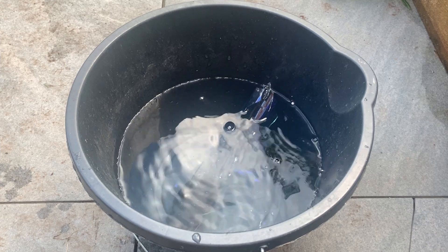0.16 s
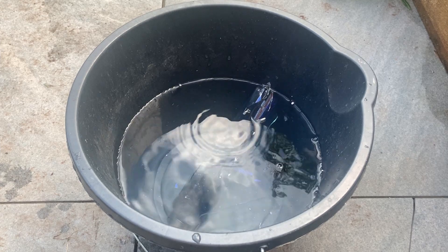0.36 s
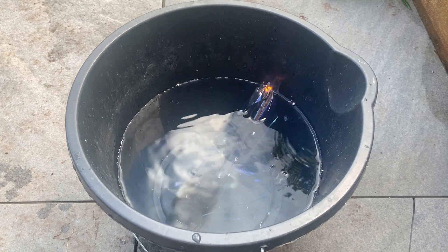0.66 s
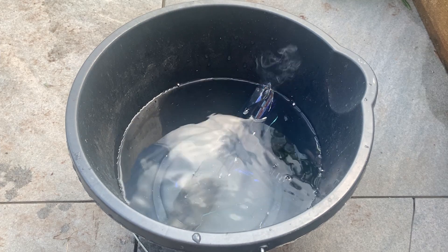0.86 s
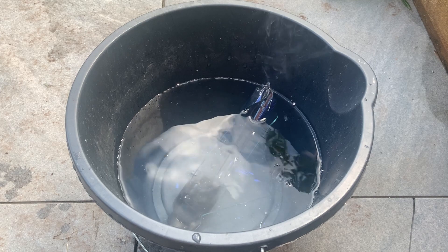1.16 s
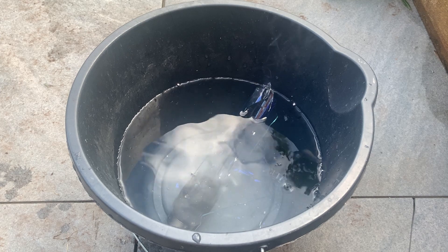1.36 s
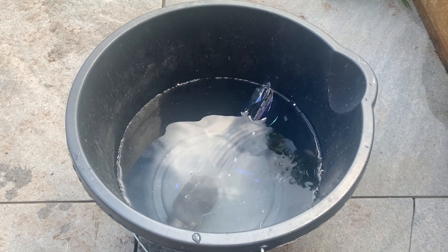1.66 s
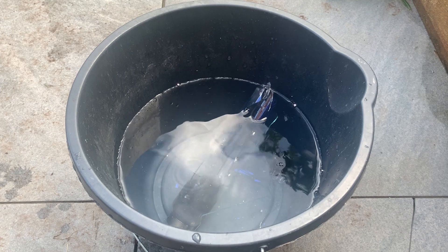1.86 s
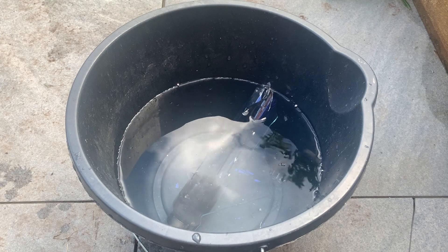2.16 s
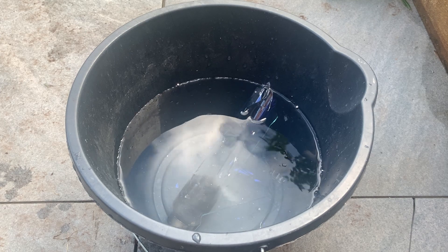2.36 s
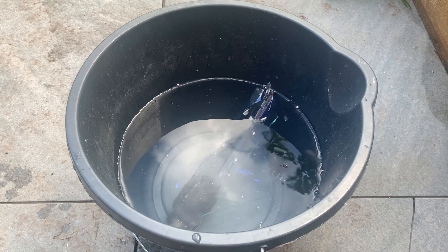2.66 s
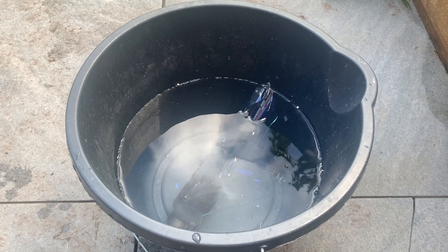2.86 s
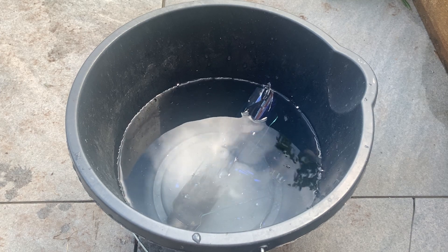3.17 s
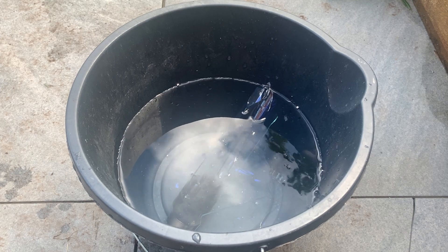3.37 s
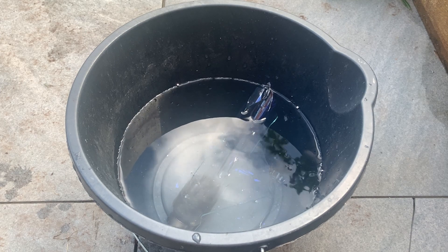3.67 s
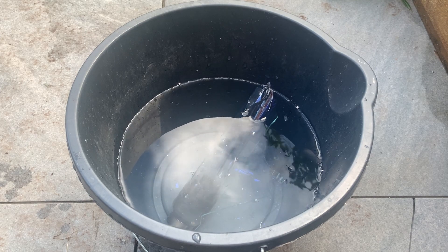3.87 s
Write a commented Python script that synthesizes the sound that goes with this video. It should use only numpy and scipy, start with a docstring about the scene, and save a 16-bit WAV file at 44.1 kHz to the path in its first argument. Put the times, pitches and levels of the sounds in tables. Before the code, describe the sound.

Steady sizzling hiss and fine crackle from a bucket of water outdoors, low throbs underneath, squeaky downward whistles midway, ending in a sharp pop.

```python
"""A lump of sodium skates on the water in a plastic bucket on a patio, heard from just above the rim.
From the start gas hisses, bubbles and spatter crackle and the water rumbles, over a faint outdoor wash; all
are shaped noise or click rains. Sharp ticks dot the fizz, and low wavering tones throb in spells from 0.5 s.
Gliding sines whistle downwards from 1.8 to 3 s, then the fizz shifts colour as the lump reaches the wall.
At the very end the gas catches fire: noise cracks, then a pop of swelling and dying sines."""
import sys
import numpy as np
from scipy import signal
from scipy.fft import rfft, irfft, next_fast_len
from scipy.io import wavfile

SR = 44100
rng = np.random.default_rng(int(sys.argv[2]) if len(sys.argv) > 2 else 0)


def master_out(mix):
    """Clip the mix to full scale and print it as 16-bit PCM to the path in sys.argv[1]."""
    frames = np.transpose(np.atleast_2d(mix))
    ceiling = np.clip(frames, -1, 1)
    pcm = np.round(ceiling * 32767).astype(np.int16)
    wavfile.write(sys.argv[1], SR, pcm)


N = 177237
T = np.arange(N) / SR  # s
FREQS = np.arange(next_fast_len(N) // 2 + 1) * SR / next_fast_len(N)  # Hz

# where the lump floats: [t/s, place: 0 off the wall .. 1 against it]
LUMP_DRIFT = [(3.05, 0), (3.2, 1)]
# how hard the water boils round the metal: [t/s, level/dB]
BOIL_LEVEL = [(0.0, -51), (0.12, -53.5), (0.17, -50), (0.23, -46.5), (0.48, -47.5), (0.58, -44.5),
              (0.64, -45.5), (1.02, -44), (1.17, -46), (2.64, -47), (2.67, -50), (2.87, -48.5),
              (2.89, -50.5), (3.15, -49.5), (3.21, -46), (3.28, -47.5), (3.47, -46.5), (3.84, -51),
              (3.94, -47)]
STEADY_BOIL_DB = -46
# the escaping gas, before JET_GAIN_DB: [t/s, level/dB]
GAS_LEVEL = [(0.0, -38), (0.19, -39.5), (0.21, -42), (0.46, -40.5), (2.07, -41.5), (2.09, -44.5),
             (2.2, -42), (3.16, -42), (3.49, -38), (3.6, -40.5), (3.91, -37.5), (4.02, -44.5)]
JET_GAIN_DB = 3.5
# sudden spurts of gas: [t/s, rise/dB]
GAS_SPURTS = [(1.105, 2), (2.345, 3), (2.532, 4.5), (2.865, 2), (3.111, 3.5), (3.79, 2.5)]
SPURT_S, SPURT_JET_SHARE = 0.0064, 0.88  # bell width; part of the rise in dB that the jet takes

# relative spectra of the fizz in open water and against the wall: [f/Hz, level/dB]
JET_COLOUR = [(2000, -40), (5000, -24), (7000, -15), (7800, -12), (8100, -3.5), (8450, -1.3), (8700, -2.5),
              (9200, 1), (10000, .3), (10500, -1), (11100, -.3), (12300, -2.3), (12900, -1), (14300, -4),
              (15800, -4.5)]
JET_WALL_COLOUR = [(2000, -40), (5000, -22), (7000, -15), (7850, -12), (8100, 0), (8550, .7), (9100, -.7),
                   (9800, -3.5), (11700, 1), (12300, 0), (12950, 2.5), (14350, -8.5), (15200, -2),
                   (15800, -2)]
BUBBLE_COLOUR = [(1000, -30), (1950, -14), (2650, -4.5), (2950, -3), (3300, -1), (3750, .7), (4100, -1.5),
                 (4650, -8), (5300, -6.5), (6000, 0), (6600, -6.5), (7200, -3.5), (7700, -6), (10000, -10),
                 (16000, -20)]
BUBBLE_WALL_COLOUR = [(1000, -32), (2300, -14), (3000, -6), (4400, -3), (5300, 0), (6000, 0), (6450, -6),
                      (7700, -7), (16000, -18)]
# relative spectra of spatter, churning water, rumble, igniting gas and still outdoor air: [f/Hz, level/dB]
SPATTER_COLOUR = [(120, -10), (220, 1.5), (310, -3), (400, -.5), (510, -1), (580, -1), (660, -.5),
                  (750, -.5), (880, 2), (1100, .5), (1400, -2), (2000, -1.5), (3000, -5), (6000, -22)]
CHURN_COLOUR = [(200, -20), (330, -6), (400, 0), (520, 1), (580, -8), (750, -5), (1200, -25)]
RUMBLE_COLOUR = [(20, -50), (40, -18), (60, -5.5), (80, 5), (100, -3), (125, -1.5), (170, -15), (230, -13),
                 (320, -46), (600, -32)]
CRACK_COLOUR = [(300, -14), (1200, 6), (2000, 6), (2600, 8), (4000, 7), (5600, 7), (8000, -3), (14000, -14)]
AIR_COLOUR = [(30, -6), (100, 0), (300, -3), (500, -1), (900, 0), (1500, -4), (3000, -9), (4400, -30),
              (16000, -38)]

# levels at a steady boil, and the dB that each gains for one dB more boiling
BUBBLE_DB, BUBBLE_GROWTH = -42.5, 1.82
SPATTER_DB, SPATTER_GROWTH = -53.5, 1
CHURN_DB, CHURN_GROWTH = -65, 4.5
RUMBLE_DB, RUMBLE_GROWTH = -53, 0.9
SPATTER_AT_WALL_DB = -2
# air resonances of the bucket: [f/Hz, width/Hz, lift/dB]
BUCKET_RESONANCES = [(490, 90, 1.5), (875, 90, 3), (1290, 80, 3), (2150, 140, 3), (2595, 90, 5),
                     (2956, 100, 4.5), (4006, 65, 6), (4430, 160, 2.5), (4830, 110, 2), (5400, 130, 2.5),
                     (5760, 130, 2.5), (6150, 80, 4.5), (6490, 90, 2.5)]

# the cushion's faint lasting oscillations, before waver and flutter: [f/Hz, level/dB]
LASTING_THROBS = [(54.3, -63), (96.4, -66)]
# spells of throbbing, before waver and flutter: [t/s, length/s, f/Hz, rise/(Hz/s), level/dB]
THROB_SPELLS = [(0.491, 0.64, 153.8, 29.5, -61), (1.24, 0.51, 96.54, -2, -53), (1.3, 1.3, 54.2, -1, -57.5),
                (1.6, 0.36, 124.2, 3.5, -60.5), (1.958, 0.67, 96.15, 0, -51),
                (2.65, 0.31, 54.24, -1, -52.5), (3.178, 0.26, 54.3, 2.5, -49), (3.5, 0.51, 54.3, 0.5, -58)]
THROB_ATTACK_S, THROB_RELEASE_S = 0.074, 0.04
THROB_WAVER, THROB_OCTAVE_DB = 0.0337, -16  # rms share of the pitch; octave against fundamental

# larger bubbles that snap, noise level at the onset: [t/s, level/dB]
BUBBLE_SNAPS = [(0.087, -35), (0.184, -36), (2.537, -36), (3.360, -28)]
SNAP_S = .00025  # decay
# steam whistles, before waver, trim and flutter: [t/s, length/s, first f/Hz, last f/Hz, level/dB]
STEAM_WHISTLES = [(1.765, 0.035, 7160, 6750, -45), (1.985, 0.09, 7080, 6200, -42),
                  (2.06, 0.085, 6400, 5270, -43), (2.215, 0.045, 5450, 4930, -42),
                  (2.51, 0.125, 7170, 5900, -43.5), (2.733, 0.1, 7070, 6300, -42),
                  (2.825, 0.066, 6380, 5660, -40.5), (2.96, 0.058, 5950, 5100, -47.5)]
WHISTLE_TRIM_DB, WHISTLE_FLUTTER_DB, WHISTLE_WAVER = -5.5, 2, 0.009  # waver: rms share of the pitch

# cracks of the igniting gas, noise level at the onset: [t/s, level/dB]
GAS_CRACKS = [(3.9655, -38), (3.967, -32), (3.969, -25)]
# air and wall of the bucket, rung by the pop, before POP_GAIN_DB: [f/Hz, peak level/dB, time to swell/s]
POP_RESONANCES = [(92, -36.5, .014), (140, -43, .012), (255, -45, .009), (360, -37.5, .0075),
                  (600, -33.5, .0057), (690, -43, .006), (965, -38.5, .004), (1280, -49, .003),
                  (1850, -53, .0022)]
POP_GAIN_DB, POP_S = 3.5, 3.9675  # POP_S: start

# stereo image by frequency: [f/Hz, left phase lead/rad, left minus right/dB, share of diffuse power]
STEREO_IMAGE = [(60, 0, 0, .015), (200, -.25, 0, .04), (330, -.9, 0, .08), (520, -1.05, -1.5, .14),
                (680, -1.3, -2.5, .2), (850, -2.3, -4, .7), (1080, .1, -3, .8), (1300, 0, -3, .33),
                (1650, .3, -2.5, .2), (2400, 1.8, -3, .33), (3400, 1.4, -.5, .23), (4100, 2.2, 0, .13),
                (4350, 3.08, 0, .001), (5050, 3.2, 0, .001), (5500, 4.3, 0, .2), (6700, 6.28, 0, .06),
                (7800, 7.3, 0, .2), (8750, 9.25, 0, .004), (9050, 9.58, 0, .004), (10000, 11.1, 0, .13),
                (12200, 14.2, 0, .13), (13100, 15.55, 0, .004), (13450, 15.87, 0, .004),
                (14300, 17.3, 0, .16), (16000, 19.4, 0, .05)]
RIPPLE_HZ, ECHO_S = 55, .004  # rate at which echoes change; longest echo delay
TOP_HZ = 15720


def undb(db):
    """Decibels to gain."""
    return 10 ** (np.asarray(db) / 20)


def unit(x):
    """Scale to rms 1."""
    return x / np.sqrt(np.mean(x ** 2))


def curve(table):
    """Join the points of a two-column time table, one value a sample."""
    s, values = np.transpose(table)
    return np.interp(T, s, values)


def filtered(x, response):
    """Filter by a complex gain at each of FREQS."""
    size = next_fast_len(N)
    return irfft(rfft(x, size) * response, size)[:N]


def colour(x, points):
    """Shape to a relative spectrum, joined over log frequency; rms 1."""
    hz, db = np.transpose(points)
    level_db = np.interp(np.log(FREQS + 1), np.log(hz), db)
    return unit(filtered(x, undb(level_db)))


def noise(points):
    """Steady coloured hiss; rms 1."""
    return colour(rng.standard_normal(N), points)


def walk(rate):
    """Smooth random drift with most of its motion below rate in Hz; rms 1."""
    return unit(filtered(rng.standard_normal(N), 1 / (1 + (FREQS / rate) ** 4)))


def bursts(per_s, spread_db):
    """A dense rain of clicks of random sign, most small and a few large; rms 1."""
    happens = rng.random(N) < per_s / SR
    size = undb(spread_db * np.minimum(rng.exponential(size=N), 5))
    return unit(happens * size * rng.choice([-1, 1], N))


def tone(hz):
    """A sine of rms 1 that follows a pitch curve."""
    return np.sqrt(2) * np.sin(2 * np.pi * np.cumsum(hz) / SR)


def vigour():
    """Decibels by which the boiling exceeds its steady level."""
    return curve(BOIL_LEVEL) - STEADY_BOIL_DB


def drifting(x, open_water, at_wall):
    """The colour of a source changes as the lump drifts up to the wall."""
    near_wall = curve(LUMP_DRIFT)
    return (1 - near_wall) * colour(x, open_water) + near_wall * colour(x, at_wall)


def jet(spurt, surge_db):
    """Escaping gas hisses: a bright click rain that follows the gas flow and its spurts."""
    rain = drifting(bursts(per_s=22000, spread_db=2.0), JET_COLOUR, JET_WALL_COLOUR)
    level_db = curve(GAS_LEVEL) + JET_GAIN_DB + SPURT_JET_SHARE * surge_db
    return rain * undb(level_db + 0.4 * spurt + 1.28 * walk(rate=190))


def bubbles(spurt):
    """Tiny bubbles burst, and grow louder with the boiling."""
    rain = drifting(bursts(per_s=14000, spread_db=0.5), BUBBLE_COLOUR, BUBBLE_WALL_COLOUR)
    level_db = BUBBLE_DB + BUBBLE_GROWTH * vigour()
    return rain * undb(level_db + 0.71 * spurt + 0.37 * walk(rate=250))


def spatter(spurt):
    """Spatter patters at lower pitches, a little softer against the wall."""
    rain = colour(bursts(per_s=9000, spread_db=1.17), SPATTER_COLOUR)
    level_db = SPATTER_DB + SPATTER_GROWTH * vigour() + SPATTER_AT_WALL_DB * curve(LUMP_DRIFT)
    return rain * undb(level_db + 0.24 * spurt)


def churn():
    """A hard boil churns the water: dull noise that swells steeply with the boiling."""
    return noise(CHURN_COLOUR) * undb(CHURN_DB + CHURN_GROWTH * vigour())


def bucket(x):
    """The air in the bucket rings at its own pitches."""
    lift_db = sum(db / (1 + (2 * (FREQS - hz) / width) ** 2) for hz, width, db in BUCKET_RESONANCES)
    return filtered(x, undb(lift_db))


def fizz():
    """Gas leaves the metal in uneven spurts that drive the jet, the bubbles and the spatter together."""
    spurt = walk(rate=19.0)
    surge_db = sum(db * np.exp(-.5 * ((T - s) / SPURT_S) ** 2) for s, db in GAS_SPURTS)
    water = bubbles(spurt) + spatter(spurt) + churn()
    return jet(spurt, surge_db) + bucket(water) * undb(surge_db)


def throb(hz):
    """A low oscillation with a weak octave, uneven in pitch and strength."""
    hz = hz * (1 + THROB_WAVER * walk(rate=14.6))
    flutter = undb(1.8 * walk(rate=67))
    return (tone(hz) + undb(THROB_OCTAVE_DB) * tone(2 * hz)) * flutter


def cushion():
    """The gas cushion shakes the water: a rumble that grows with the boiling, and throbs that come in spells."""
    out = noise(RUMBLE_COLOUR) * undb(RUMBLE_DB + RUMBLE_GROWTH * vigour())
    for hz, db in LASTING_THROBS:
        out += undb(db) * throb(hz)
    for start, length, hz, rise, db in THROB_SPELLS:
        age = T - start
        attack = np.clip(age / THROB_ATTACK_S, 0, 1)
        release = np.exp(-np.maximum(age - length, 0) / THROB_RELEASE_S)
        out += undb(db) * attack * release * throb(hz + rise * np.maximum(age, 0))
    return out


def outdoors():
    """A faint wash from all round, unrelated in the left and right channels."""
    swell = undb(-69.5 + 2 * walk(rate=1.0))
    return swell * np.array([noise(AIR_COLOUR) for _ in range(2)])


def snaps():
    """Now and then a larger bubble bursts with a sharp tick of bright, quickly dying noise."""
    envelope = sum(undb(db) * (T >= s) * np.exp(-np.abs(T - s) / SNAP_S) for s, db in BUBBLE_SNAPS)
    return noise(JET_COLOUR) * envelope


def whistles():
    """Steam squeals through a gap under the metal; the unsteady pitch sinks as the gap widens."""
    out = np.zeros(N)
    waver = 1 + WHISTLE_WAVER * walk(rate=370)
    strength = undb(WHISTLE_TRIM_DB + WHISTLE_FLUTTER_DB * walk(rate=71))
    for start, length, first_hz, last_hz, db in STEAM_WHISTLES:
        age = np.clip((T - start) / length, 0, 1)
        arch = np.sqrt(4 * age * (1 - age))  # silent at both ends
        glide_hz = first_hz + (last_hz - first_hz) * age
        out += undb(db) * arch * tone(glide_hz * waver)
    return out * strength


def ignition():
    """The hydrogen cracks alight; the bucket answers with a pop whose low notes swell last."""
    envelope = sum(undb(db) * (T >= s) * np.exp(-np.abs(T - s) / .0013) for s, db in GAS_CRACKS)
    out = noise(CRACK_COLOUR) * envelope
    age = np.maximum(T - POP_S, 0)
    for hz, db, swell in POP_RESONANCES:
        rise = age / swell
        shape = (rise * np.exp(1 - rise)) ** 3  # peaks at 1 when age equals swell
        out = out + undb(db + POP_GAIN_DB) * shape * np.sin(2 * np.pi * hz * age)
    return out


def ripples(x, count=10):
    """Brief echoes off the wall and the rippling water; each keeps changing in strength and sign."""
    lags = rng.integers(1, int(ECHO_S * SR), count)
    return sum(np.pad(x, (lag, 0))[:N] * walk(rate=RIPPLE_HZ) for lag in lags) / np.sqrt(count)


def stereo(x):
    """Place the sound by phase and level at each frequency, and mix in restless diffuse echoes."""
    hz, *columns = np.transpose(STEREO_IMAGE)
    lead, balance_db, share = (np.interp(FREQS, hz, c) for c in columns)
    out = []
    for side in (1, -1):  # left, right
        gain = undb(side * balance_db / 2)
        direct = filtered(x, gain * np.sqrt(1 - share) * np.exp(.5j * side * lead))
        diffuse = filtered(ripples(x), gain * np.sqrt(share))
        out.append(direct + diffuse)
    return np.array(out)


def scene():
    """The reaction sounds from one spot in the bucket, in the open air."""
    reaction = fizz() + cushion() + snaps() + whistles() + ignition()
    return stereo(reaction) + outdoors()


def record(dry):
    """The phone cuts the top: a steep low-pass at TOP_HZ."""
    return signal.sosfilt(signal.ellip(10, .2, 80, TOP_HZ, fs=SR, output="sos"), dry)


dry = scene()
out = record(dry)
master_out(out)
```